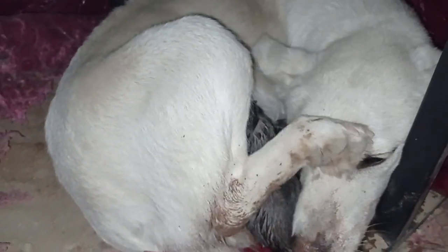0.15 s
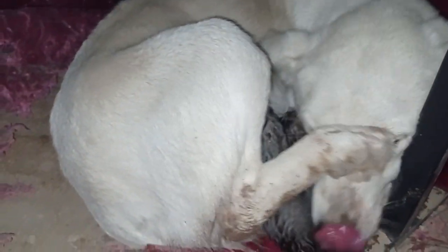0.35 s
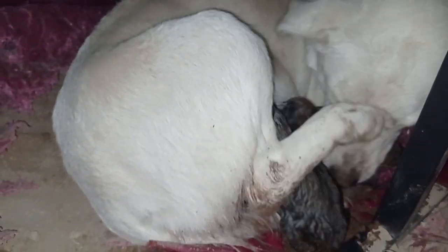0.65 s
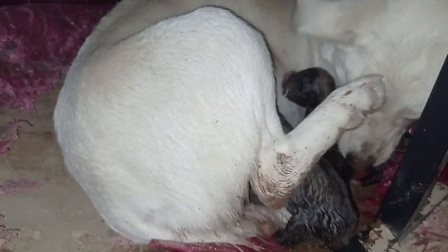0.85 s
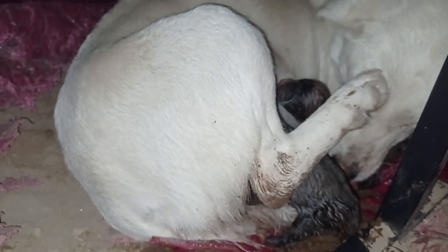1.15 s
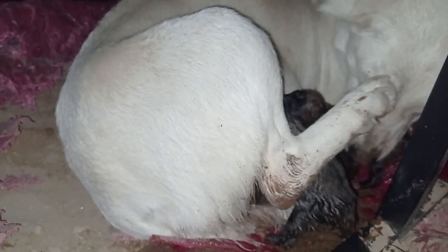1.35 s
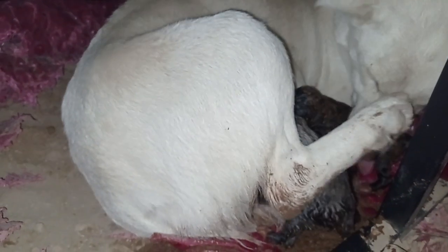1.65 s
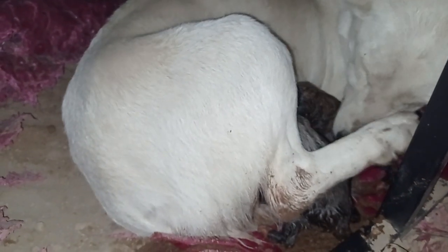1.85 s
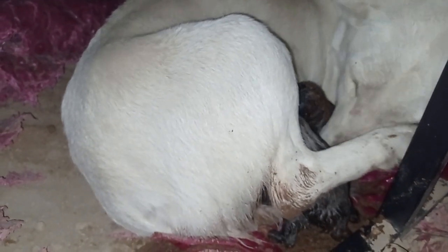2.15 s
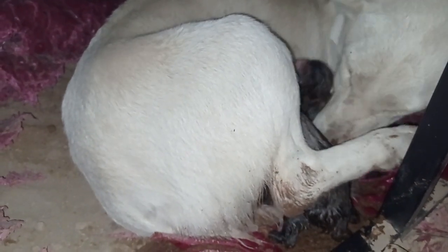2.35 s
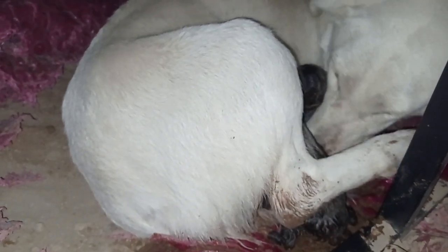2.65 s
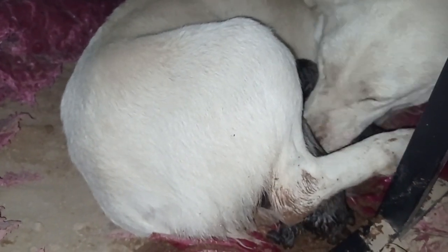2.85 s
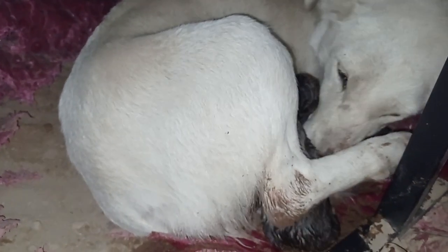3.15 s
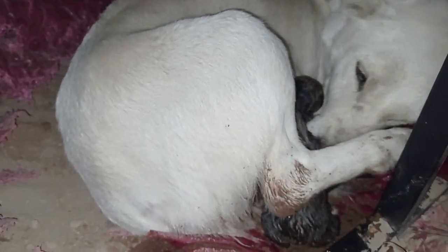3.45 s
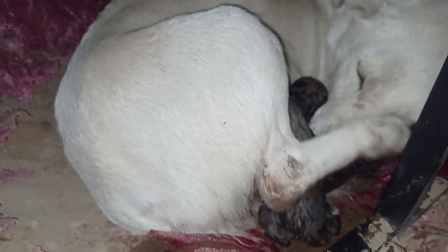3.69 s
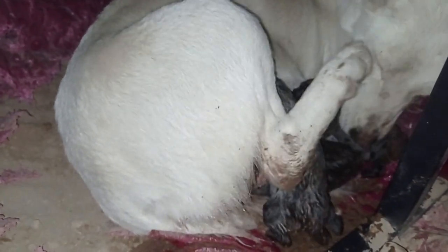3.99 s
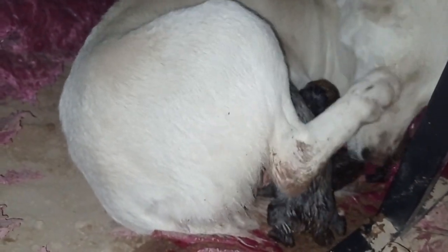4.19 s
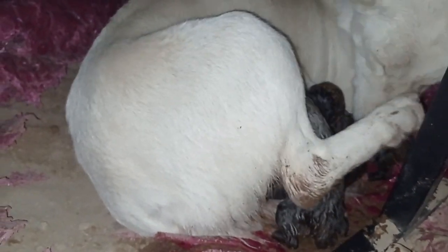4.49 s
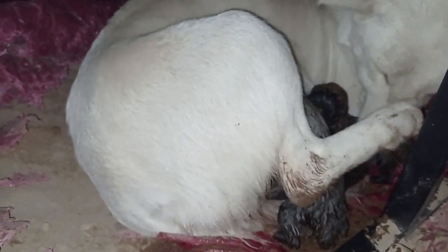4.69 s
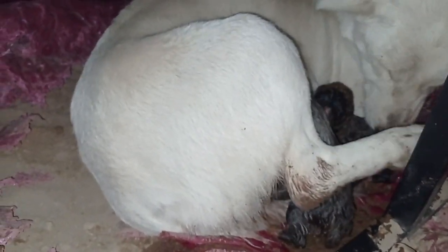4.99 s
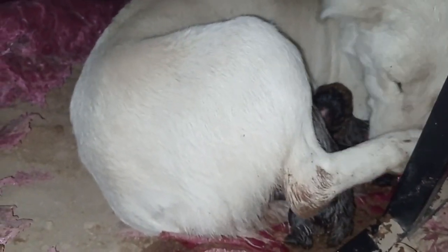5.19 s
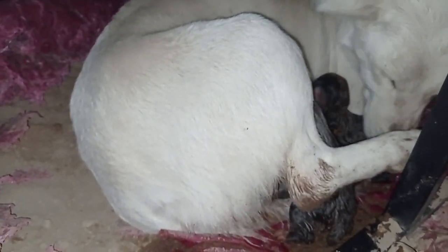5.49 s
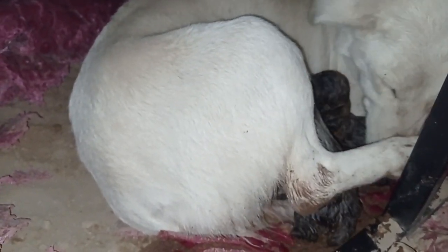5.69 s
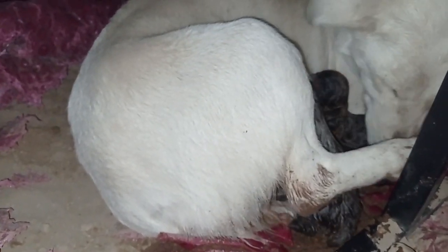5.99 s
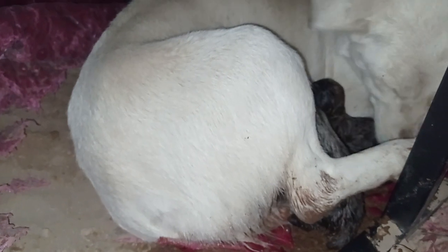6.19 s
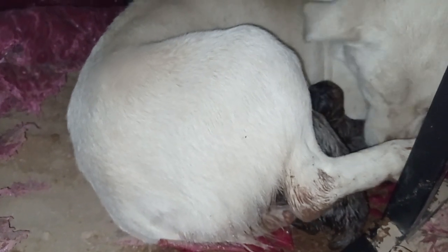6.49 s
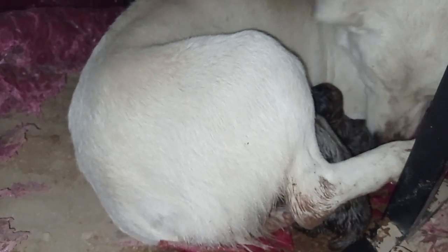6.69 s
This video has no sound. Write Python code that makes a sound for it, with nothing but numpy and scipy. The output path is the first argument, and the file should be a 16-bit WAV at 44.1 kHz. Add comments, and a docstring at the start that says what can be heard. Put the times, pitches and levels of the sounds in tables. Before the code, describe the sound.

Close, dry sound of a mother dog licking her newborn. Faint wet rustle leads into a thin trembling squeal that breaks off in a short rasp and gulp. A tiny grunt and wet pops follow, then a second cry with a sudden upward yelp near its start, more licking, and a third cry swelling slowly from a weak whine. Two brief squeaky grunts end it over soft room rumble and hiss.

```python
"""In a quiet room a newborn puppy gives three long wavering cries and three short grunts.
Each voice is a stack of harmonics on a gliding pitch, shaped by moving throat and mouth resonances.
Its mother licks it: small cavities snapping open make wet pops and sharp ticks, a few of them in the
puppy's voice, and swelling noise makes the rustle of tongue on fur and a short rasp as the first cry ends.
Steady coloured noise gives the room rumble and microphone hiss."""
import sys
import numpy as np
from scipy import signal
from scipy.io import wavfile
from scipy.ndimage import uniform_filter1d

SR = 44100
rng = np.random.default_rng(int(sys.argv[2]) if len(sys.argv) > 2 else 0)


def how_loud(loudness_db):
    """Turn decibels into a plain amplitude multiplier (0 dB gives 1, 20 dB gives 10)."""
    steps = np.asarray(loudness_db, float) / 20
    return 10 ** steps


def to_wav(sig):
    """Store sig (one row per channel, or 1-D mono) as 16-bit WAV at the path in sys.argv[1].

    Samples outside -1..1 are clipped; the rate is SR.
    """
    pcm = np.clip(np.atleast_2d(sig), -1, 1) * 32767
    pcm = np.round(pcm).astype(np.int16)
    wavfile.write(sys.argv[1], SR, pcm.T)  # frames by channels


N = 301644  # length in samples

# The puppy's cries, one list of rows for each cry.
# Each row: time in seconds, pitch in Hz, effort in dB, mouth resonance in Hz, tongue resonance in Hz,
# pressed voice in dB per octave.
CRY_PATHS = [
    [(0.397, 519, -60, 1200, 2350.0, 7), (0.436, 603, -50, 1220, 2520, 11),
     (0.466, 597, -47.5, 1190, 2440, 9.5), (0.544, 637.5, -41, 1310, 2240, 10),
     (0.634, 611, -33.5, 1220, 2430, -1), (0.7, 539.7, -39, 1141, 2380, 5.5),
     (0.856, 604.7, -37.5, 1260, 2460, -2.5), (0.915, 618.7, -35, 1240, 2360, -2.5),
     (0.953, 608, -34.5, 1257, 2310, 0.5), (0.976, 633, -34, 1226, 2180, -10),
     (1.006, 568, -36.5, 1135, 2690, 2), (1.078, 489, -45, 1074, 2180, 8),
     (1.15, 543.5, -40, 1120, 2410, 5.5), (1.21, 556, -37, 1147, 2630, 5.5),
     (1.264, 518, -40.5, 1050, 2540, 4), (1.301, 538, -37, 1010, 2700, 6.5),
     (1.313, 508, -40, 977, 2537, 3), (1.319, 421.4, -38.5, 685, 2300.0, 2),
     (1.331, 550, -44, 720, 2200.0, 7), (1.35, 500.0, -57, 689, 2200.0, 0.0)],
    [(2.785, 559, -57, 1350.0, 2650, 2), (2.854, 615.3, -48, 1480, 2650, 3),
     (3.034, 690, -33, 1740, 2590, -5.5), (3.046, 692, -35, 1190, 2510.0, 0),
     (3.069, 824, -28.5, 1200, 3030, -1.5), (3.088, 821, -30.5, 1250, 2640, -1),
     (3.116, 613.3, -34, 1100, 2780, 1.5), (3.214, 620.4, -40.5, 1085, 2400, 8),
     (3.28, 585, -41, 1420, 2640, 2.5), (3.394, 613.4, -35, 1345, 2580, -3.5),
     (3.424, 592.7, -36.5, 1335, 2580, 1.5), (3.49, 602, -36, 1370, 2620, -3),
     (3.515, 592.5, -35.5, 1370, 2710, -3), (3.556, 564.4, -38, 1360, 2640, -6.5),
     (3.628, 475.7, -44.5, 1021, 3080, 6.5), (3.706, 440, -45.5, 1150, 3080, 3),
     (3.75, 376, -54.5, 1030, 2894, 5)],
    [(4.412, 521, -56.5, 990, 2260, 21), (4.484, 586, -50, 1220, 2520, 15.5),
     (4.52, 566.5, -44.5, 1190, 2450, 14), (4.592, 588, -41.5, 1250, 2450, 11.5),
     (4.664, 545.3, -44.5, 1130, 2640, 15), (4.71, 553, -44, 1156, 2420, 16.5),
     (4.83, 599, -41, 1210, 2600, 11), (4.874, 591, -39.5, 1247, 2520, 7.5),
     (5.012, 628.2, -35, 1353, 2280, -2), (5.062, 630, -37.5, 1227, 2210, 6),
     (5.16, 643.3, -33.5, 1190, 2192, 1.5), (5.272, 677.3, -34.5, 1136, 2190, 8),
     (5.294, 661, -34, 1016, 2010, 4), (5.342, 605, -34, 1080, 3050, -8.5),
     (5.396, 576, -35.5, 1050, 2780, -2), (5.438, 527.7, -41.5, 1076, 2308, -7),
     (5.51, 492.6, -41, 1100, 2926, -4), (5.564, 412.7, -46.5, 1135, 2740, -0.5),
     (5.606, 391, -56, 1124, 2262, 6)],
]
# The back of the throat during the cries.
# Each row: time in seconds, nasal notch in Hz, ring of the upper cavity in dB, treble in dB.
CRY_UPPER_THROAT = [(0.45, 4300, -4, 15.5), (0.72, 3700, -1, 6.5), (0.9, 3600, -8, -1),
                    (1.01, 3630, 4, 8.5), (1.09, 4570, 9.5, 18.5), (1.22, 3200, 7, 8),
                    (2.87, 4260, -7, 12.5), (3.01, 3470, 4.5, -1.5), (3.17, 3300, 1, 8),
                    (3.33, 5470, 1.5, 6.5), (3.5, 5420, 9, 5.5), (3.57, 2740, 9.5, 2.5),
                    (3.66, 2080, -10.5, -1), (4.45, 3700, -16, 20.5), (4.57, 5460, -10.5, 10.5),
                    (4.69, 3580, -10, 14), (4.93, 4020, 9, 3), (5.12, 5800, 6.5, 12), (5.28, 6430, 5, 17.5),
                    (5.37, 5330, 9, 5.5), (5.46, 3600, -1, 8), (5.53, 3600, 2, -7)]
# The back of the throat during a grunt, which is dull on top. The row has the same columns as for the cries.
GRUNT_UPPER_THROAT = [(0, 3000, -23, -11)]
# Grunts that open bright, then shut on a hum; the hum of the third climbs towards a squeal.
# Each row: start in seconds, open time in seconds, hum time in seconds, first pitch in Hz, last pitch in Hz,
# tongue resonance in Hz, pressed voice while open in dB per octave.
GRUNT_EVENTS = [(1.905, 0.026, 0.061, 424, 432, 2780, 18), (6.251, 0.014, 0.02, 490, 414, 1940, 29),
                (6.747, 0.066, 0.11, 237.2, 850, 1840, 18.5)]
# Vocal folds and higher throat resonances, before mouth and tongue.
# Each row: frequency in Hz, level in dB.
THROAT_COLOUR = [(400, 2), (700, 2), (1200, -14.5), (1330, -21.5), (1500, -8.5), (1900, -19), (2700, -16),
                 (3500, -12.5), (4400, -8.5), (5400, -10), (6800, 7), (7800, 8.5), (9200, 17),
                 (11000, 14.5), (15000, 17)]
# How a near sound differs between the two ports.
# Each row: frequency in Hz, side level against the middle in dB, lag of the side in radians.
PORT_SPREAD = [(600, -24.5, 0.7), (935, -11, -0.5), (1276, -10, 3.5), (1380, 6, 8), (1790, -2.5, 6.5),
               (2550, -7.5, 11.5), (3600, 1, 12.5)]
# Short wet pops: tongue and lips parting, gulps where cries end, and a break in the first grunt.
# Each row: time in seconds, level in dB, ring in Hz, swell in cycles of the ring.
WET_POPS = [(0.094, -36.5, 1290, 0.66), (0.115, -33, 570, 0.76), (0.1545, -41, 650, 0.86),
            (0.2614, -37.5, 1600, 1.3), (1.302, -29, 1980, 0.35), (1.315, -31, 1400, 1.3),
            (1.931, -30, 630, 1.1), (1.9626, -32.5, 1900, 0.31), (2.328, -34.5, 1050, 0.38),
            (2.4077, -35, 546, 0.61), (2.421, -35.5, 1190, 0.54), (2.5026, -37, 683, 0.85),
            (2.6701, -27, 960, 0.42), (2.7849, -31.5, 880, 0.97), (2.88, -31.5, 810, 0.53),
            (2.907, -20, 2400, 0.67), (3.1837, -29, 1070, 0.94), (3.391, -31.5, 468, 0.46),
            (3.572, -29, 900, 0.32), (3.743, -33, 450, 0.87), (3.8058, -32.5, 760, 0.57),
            (3.8621, -34.5, 805, 0.56), (4, -34, 764, 0.7), (4.0061, -33, 477, 1.03),
            (4.1452, -37.5, 750, 0.87), (4.178, -38.5, 1220, 0.69), (4.2418, -35.5, 2180, 0.51),
            (4.5164, -13, 1970, 0.52), (4.774, -30, 3000, 0.86), (5.02, -33, 600.0, 0.34),
            (5.143, -32.5, 496, 0.87), (5.442, -34.5, 770, 1.2), (5.5924, -33.5, 1020, 0.88),
            (5.6035, -29.5, 600.0, 0.81), (5.9044, -30, 716, 0.51), (5.9395, -36, 610, 0.49),
            (5.9986, -37, 390, 0.82), (6.459, -36.5, 920, 0.22), (6.5408, -38.5, 382, 0.91),
            (6.6777, -39, 700, 0.89)]
# Small saliva bubbles bursting. Each row: time in seconds, level in dB.
TICK_EVENTS = [(0.0278, -45.5), (0.262, -46), (1.732, -46), (1.9625, -48), (1.301, -46), (4.759, -48.5),
               (4.915, -56), (5.542, -59), (5.56, -49.5), (2.4107, -52), (2.6487, -60), (2.67, -50.5),
               (4.7277, -43.5), (5.3992, -44.5), (5.59, -53), (5.857, -48), (6.523, -52), (5.255, -59),
               (1.015, -54), (1.253, -51.5), (5.156, -47), (6.538, -41.5)]
# The rings inside every tick. Each row: frequency in Hz, level against the tick in dB.
TICK_RINGS = [(8720, 9.5), (6300, 1.5), (11900, -5), (13800, -13), (3300, -12.5)]
# Rustling noise: strokes of the tongue over wet fur, and a short rasp as the first cry ends.
# Each row: loudest moment in seconds, length in seconds, level in dB, wetness in dB.
RUSTLE_EVENTS = [(0.037, 0.77, -60.5, 0.5), (0.337, 0.57, -54, -5), (0.596, 1.1, -55.5, 1.5),
                 (1.14, 2.7, -56.5, -6), (1.313, 0.06, -40, -22), (1.59, 1.9, -54.5, -4.5),
                 (2.104, 0.12, -52, -6.5), (2.325, 0.069, -52, -15), (2.433, 0.059, -48.5, -2.5),
                 (2.53, 0.06, -47, -21), (2.772, 0.37, -46.5, -10.5), (3.103, 0.59, -47.5, -6.5),
                 (3.632, 0.51, -50, -5.5), (4.035, 0.071, -46, -10), (4.222, 0.39, -62.5, 5.5),
                 (4.503, 1.08, -52, -12), (5.16, 0.3, -49.5, -11), (5.433, 0.61, -46.5, -5.5),
                 (5.94, 0.031, -48.5, -4.5), (5.999, 0.2, -53.5, -2.5), (6.306, 0.29, -49.5, -6.5),
                 (6.55, 0.09, -45, -5.5), (6.766, 0.33, -60, 0)]
# Colour of the wet fizz in a rustle. Each row: frequency in Hz, relative level in dB per Hz.
FIZZ_COLOUR = [(3000, -53), (4500, -5.5), (7400, -2.5), (9000, 5), (11000, -7), (15000, -12)]
# Colour of the dull body of a rustle. Each row: frequency in Hz, relative level in dB per Hz.
BODY_COLOUR = [(170, -9.5), (300, -3.5), (760, -2.5), (1200, -8), (2800, -13.5), (4200, -21), (7000, -54)]
# Colour of the steady room sound. Each row: frequency in Hz, relative level in dB per Hz.
ROOM_COLOUR = [(30, -62), (78, 0.5), (105, -3), (160, -10), (400, -16), (1100, -24), (2400, -27),
               (5000, -30), (9000, -30), (15000, -29.5)]
# How alike left and right are in the noises. Each row: frequency in Hz, likeness from 0 to 1.
LEFT_RIGHT_LIKENESS = [(60, 0.75), (200, 0.7), (700, 0.85), (1400, 0.14), (3000, 0.014)]


def puppy_cries():
    """The folds of a small throat buzz at a wavering pitch while mouth and tongue reshape the sound."""
    out = np.zeros((2, N))
    for rows in CRY_PATHS:
        add(out, *voice(rows, CRY_UPPER_THROAT, jitter=0.002, breath_db=-33, leak=0))
    return out


def puppy_grunts():
    """Short calls, with a rougher pitch and more leaking air than the cries."""
    out = np.zeros((2, N))
    for event in GRUNT_EVENTS:
        add(out, *voice(grunt_path(*event), GRUNT_UPPER_THROAT, jitter=0.008, breath_db=-23, leak=2.5))
    return out


def grunt_path(start, open_s, hum_s, first_hz, last_hz, tongue_hz, pressed_db):
    """Pitch climbs, drops as the mouth snaps shut, then a hum holds and glides to its last pitch, fading."""
    glide_hz_per_s, hum_hz, snap_s = 3300, 427.5, 0.0044
    open_mouth_hz, shut_mouth_hz = 1020, 570
    shut = start + open_s + snap_s
    # three points with the mouth open, then three with it shut
    open_times = [start, start + 0.3 * open_s, start + open_s]
    shut_times = [shut, shut + 0.26 * hum_s, shut + hum_s]
    pitch = [first_hz + glide_hz_per_s * (x - start) for x in open_times] + [hum_hz, hum_hz, last_hz]
    effort_db = -45.5 + np.array([-16, -10, 0, 3, 3, -22])
    mouth_hz = [open_mouth_hz] * 3 + [shut_mouth_hz] * 3
    pressed = [pressed_db] * 3 + [12, 3, 3]
    return np.transpose([open_times + shut_times, pitch, effort_db, mouth_hz, [tongue_hz] * 6, pressed])


def voice(rows, upper, jitter, breath_db, leak):
    """Harmonics pass two moving resonances, an upper cavity and a nasal notch, with a little air added."""
    s, pitch, *columns = np.transpose(rows)
    t = np.arange(s[0], s[-1], 1 / SR)
    hz = uniform_filter1d(np.interp(t, s, pitch), size=350)
    smooth = [uniform_filter1d(np.interp(t, s, column), size=200) for column in columns]
    effort_db, mouth_hz, tongue_hz, pressed_db = smooth

    wobble = evened(uniform_filter1d(rng.standard_normal(len(t)), size=200))
    glide_speed = abs(np.gradient(np.log(hz))) * SR
    strain = 0.33 + np.minimum(glide_speed, 5)  # fast glides unsettle the folds
    phase = 2 * np.pi * np.cumsum(hz * (1 + jitter * strain * wobble)) / SR

    f = np.arange(1, 26)[:, None] * hz  # 25 harmonics
    levels = harmonic_levels(f, t, effort_db, mouth_hz, tongue_hz, pressed_db, upper)
    out = np.zeros((2, len(t)))
    for k, level in enumerate(levels, 1):
        shimmer_db = 4.5 * drift(t, 14) * min(k * k / 50, 1)  # steadier in the low harmonics
        wander = 0.16 * k * drift(t, 1.394)  # the puppy squirms
        wave = ports(k * phase - 1.3 - 0.5 * k, k * hz, wander)
        out += np.sqrt(2) * level * how_loud(shimmer_db) * wave

    # air leaking past strained folds, puffed once a cycle
    air_band = signal.butter(2, [500, 3500], "band", fs=SR, output="sos")
    air = signal.sosfilt(air_band, rng.standard_normal(out.shape))
    puffs = 1 + 0.4 * np.cos(phase)
    out += levels[0] * how_loud(breath_db) * (strain + leak) * air * puffs
    return s[0], out * signal.windows.tukey(len(t), 400 / len(t))


def harmonic_levels(f, t, effort_db, mouth_hz, tongue_hz, pressed_db, upper):
    """How strong each harmonic is after the folds, throat, mouth, tongue and nose have shaped it."""
    cavities = resonance(f, mouth_hz, width_hz=135) * resonance(f, tongue_hz, width_hz=270)
    when, notch_hz, ring_db, treble_db = np.transpose(upper)
    # the upper cavity rings around 3620 Hz, 0.29 octaves wide
    ring = np.interp(t, when, ring_db) * np.exp(-(np.log2(f / 3620) / 0.29) ** 2)
    # the nasal notch takes out 10 dB, 400 Hz wide
    notch = -10 * np.exp(-((f - np.interp(t, when, notch_hz)) / 400) ** 2)
    # pressing tilts the harmonics between these two frequencies
    press_from_hz, press_to_hz = 1410, 3440
    tilt_db = pressed_db * np.log2(np.clip(f, press_from_hz, press_to_hz) / press_from_hz)
    # from 3800 Hz up, the treble takes over from the pressing within 0.73 octaves
    high = np.clip(np.log2(f / 3800) / 0.73, 0, 1)
    top_db = (1 - high) * tilt_db + high * np.interp(t, when, treble_db)
    return how_loud(effort_db + read(THROAT_COLOUR, f) + top_db) * abs(cavities * how_loud(ring + notch))


def resonance(f, centre_hz, width_hz):
    """Response of one cavity: 1 at low pitch, strongest near its centre, weak far above."""
    return 1 / (1 - (f / centre_hz) ** 2 + 1j * f * width_hz / centre_hz ** 2)


def ports(turn, hz, wander):
    """A wave as the two ports hear it: nearby surfaces add to one what they take from the other."""
    side = how_loud(read(PORT_SPREAD, hz)) * np.sin(turn - read(PORT_SPREAD, hz, 2) + wander)
    return np.sin(turn) + np.array([[1], [-1]]) * side


def pops_and_ticks():
    """Small cavities snap open: wet pops with a weaker upper ring, ticks, and a faint scatter."""
    out = np.zeros((2, N))
    for s, db, hz, cycles in WET_POPS:
        main_ring = pop(db, hz, cycles, sag=0.064)
        upper_ring = pop(db - 18, 3.18 * hz, 1.14 * cycles, sag=0.24)
        add(out, s, main_ring + upper_ring)
    for s, db in TICK_EVENTS:
        rings = [pop(db + ring_db, hz * rng.uniform(0.89, 1.106), cycles=3.1, sag=0)
                 for hz, ring_db in TICK_RINGS]
        add(out, s, sum(rings))
    # 220 faint pops at random moments, more of them low than high
    for when, size, pitch in rng.random((220, 3)):
        add(out, when * N / SR, pop(-58 + 11 * size, 420 * 30 ** pitch ** 1.7, cycles=0.8, sag=0.17))
    return out


def pop(db, hz, cycles, sag):
    """A small cavity snaps open: it swells for some cycles and dies, its pitch sagging if sag is set."""
    t = np.arange(1500) / SR
    u = t * hz / cycles  # 1 at the top of the swell
    turn = 2 * np.pi * hz * (t - sag * cycles / hz * np.log(1 + u ** 2))
    swell = (u * np.exp(1 - u)) ** 1.2
    return how_loud(db) * swell * ports(turn, hz, rng.standard_normal())


def rustling():
    """Each rustle swells and fades; it drives a dull body and, the wetter it is, a grainy fizz."""
    s, length, db, wet_db = np.transpose(RUSTLE_EVENTS)[..., None]
    t = np.arange(0, N / SR + 0.01, 0.004)
    u = (t - s) / length
    rise_db, fall_db = 31, 32  # over one length
    power = how_loud(db - np.where(u < 0, -rise_db * u, fall_db * u)) ** 2
    wet_power = power * how_loud(wet_db) ** 2
    times = np.arange(N) / SR
    body = np.interp(times, t, np.sqrt(power.sum(0)))
    fizz = np.interp(times, t, np.sqrt(wet_power.sum(0)))
    wet_sound = fizz * noise(FIZZ_COLOUR, patchy_db=2.6, flicker_db=2.8, size=256)
    return wet_sound + body * noise(BODY_COLOUR, patchy_db=2.6, flicker_db=3.2, size=512)


def echoes(x, t60, wet_db):
    """A soft-furnished room returns a short tail of sparse taps that fades by 60 dB in t60 seconds."""
    t = np.arange(8000) / SR
    signs = rng.choice([-1., 1.], (2, 8000))
    chosen = rng.random((2, 8000)) < 0.15
    taps = signs * chosen * how_loud(-60 * t / t60) * (t > 0.002)
    tail = signal.fftconvolve(x, taps / np.linalg.norm(taps[0]), axes=1)[:, :N]
    return x + how_loud(wet_db) * tail


def room_floor():
    """Steady room rumble and microphone hiss, made of one coloured noise, a little louder on the left."""
    floor = how_loud(-61.5) * noise(ROOM_COLOUR, patchy_db=1.2, flicker_db=0.3, size=2048)
    return floor * how_loud(np.array([[0.8], [-0.8]]))


def noise(spectrum, patchy_db, flicker_db, size):
    """Stereo noise of a given colour with drifting patches and frame-to-frame flicker."""
    frames, hz = 4 * N // size + 5, np.fft.rfftfreq(size, 1 / SR)
    a, b, c, d, patches = rng.standard_normal((frames, len(hz), 5)).T
    patches = uniform_filter1d(patches, size=8, axis=0)  # smooth over frequency
    patches = evened(uniform_filter1d(patches, size=20, axis=1))  # and over time
    flicker = np.minimum(rng.exponential(1, frames), 3.5)
    same = np.clip(read(LEFT_RIGHT_LIKENESS, hz), -1, 1)[:, None]
    left = a + 1j * b
    right = same * left + np.sqrt(1 - same ** 2) * (c + 1j * d)
    level_db = read(spectrum, hz)[:, None] + patchy_db * patches + flicker_db * flicker
    z = np.array([left, right]) * how_loud(level_db)
    return evened(signal.istft(z, nperseg=size, noverlap=size * 3 // 4)[1][:, :N])


def drift(t, top_hz):
    """Slow chance movement of rms 1, a sum of sines from 0.5 Hz to top_hz."""
    hz = np.geomspace(0.5, top_hz, 12)[:, None]
    waves = np.sin(2 * np.pi * (hz * t + rng.random((12, 1))))
    return evened((waves / np.sqrt(hz)).sum(0))


def evened(x):
    """Scales to rms 1."""
    return x / np.sqrt(np.mean(x ** 2) + 1e-20)


def read(points, hz, column=1):
    """Reads a table between its rows, on a log-frequency axis."""
    table = np.transpose(points)
    return np.interp(np.log(hz + 1), np.log(table[0] + 1), table[column])


def add(mix, s, sound):
    """Mixes a two-channel sound in at time s in seconds."""
    part = mix[:, round(s * SR):][:, :sound.shape[1]]
    part += sound[:, :part.shape[1]]


def scene():
    """Puppy and mother in the room, over the steady floor."""
    puppy = echoes(puppy_cries() + puppy_grunts(), t60=0.07, wet_db=-25)
    wet_sounds = echoes(pops_and_ticks(), t60=0.03, wet_db=-9)
    return puppy + wet_sounds + rustling() + room_floor()


def low_pass(x):
    """Removes everything above the highest recorded frequency."""
    return signal.sosfilt(signal.butter(12, 16340, fs=SR, output="sos"), x)


def record(dry):
    """The microphone's low cut, which weakens everything below 62 Hz, and the finished mix."""
    low_cut = signal.butter(4, 62, "high", fs=SR, output="sos")
    mix = signal.sosfilt(low_cut, dry)
    return low_pass(mix)


dry = scene()
out = record(dry)
to_wav(out)
```